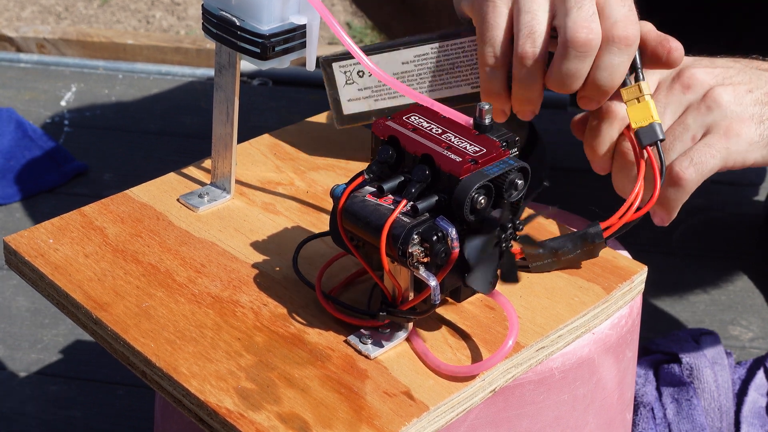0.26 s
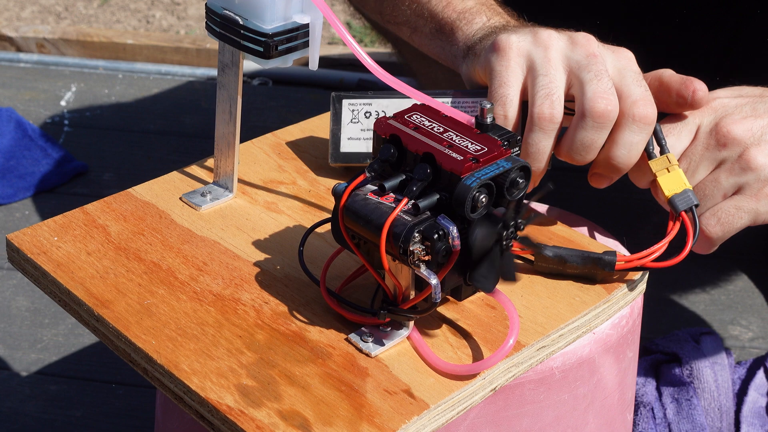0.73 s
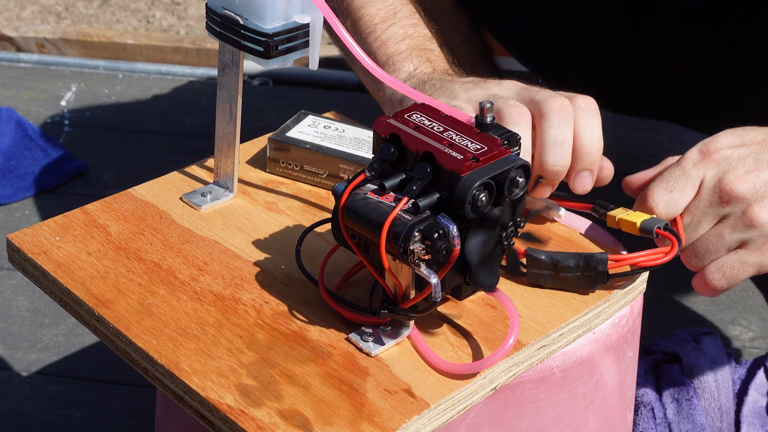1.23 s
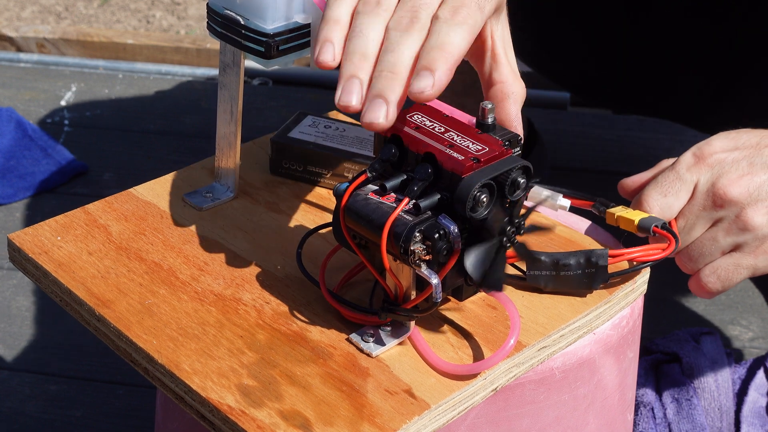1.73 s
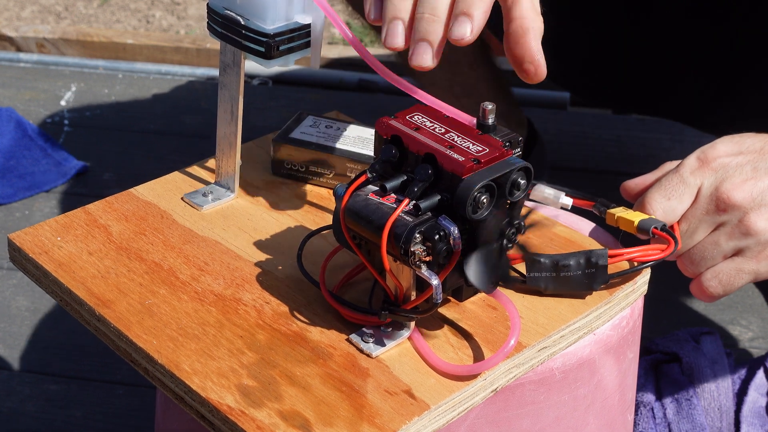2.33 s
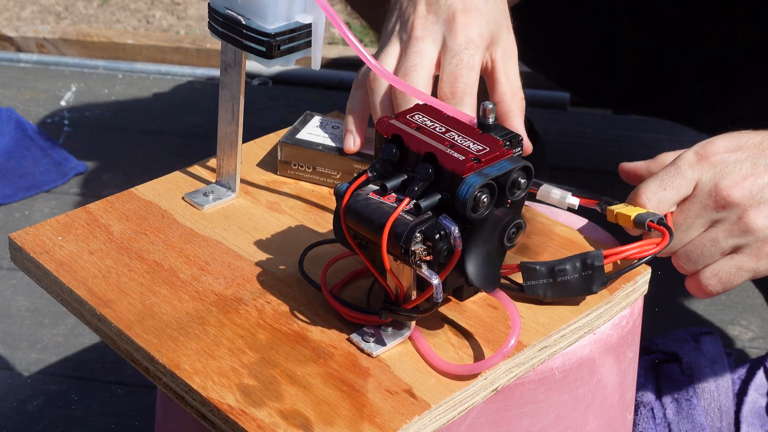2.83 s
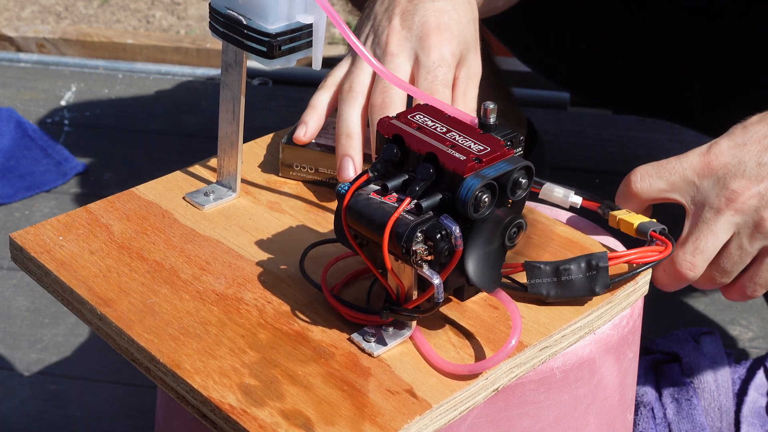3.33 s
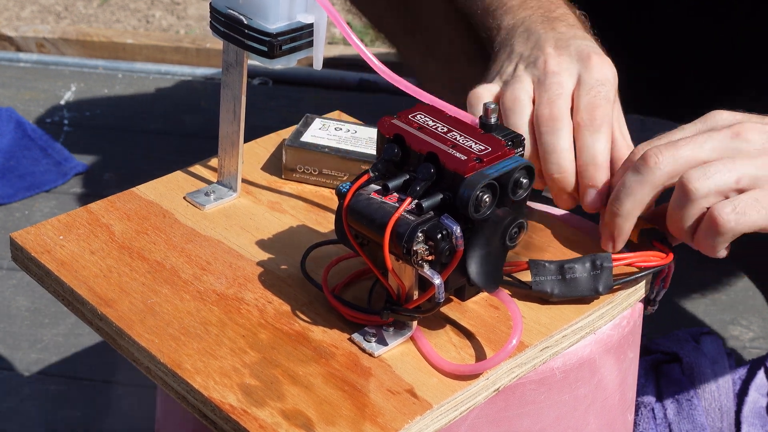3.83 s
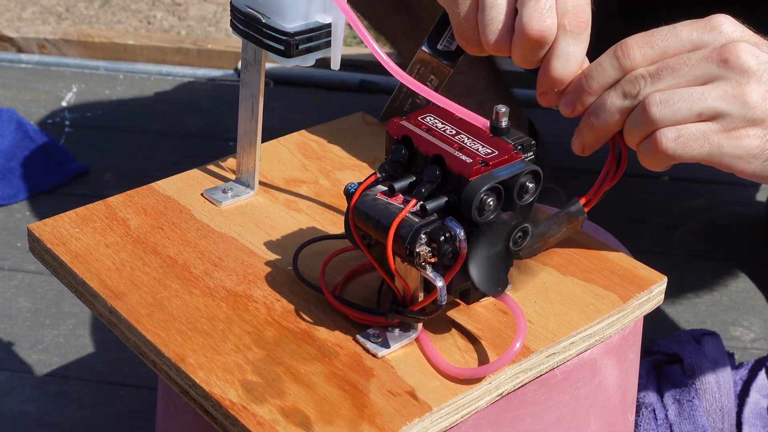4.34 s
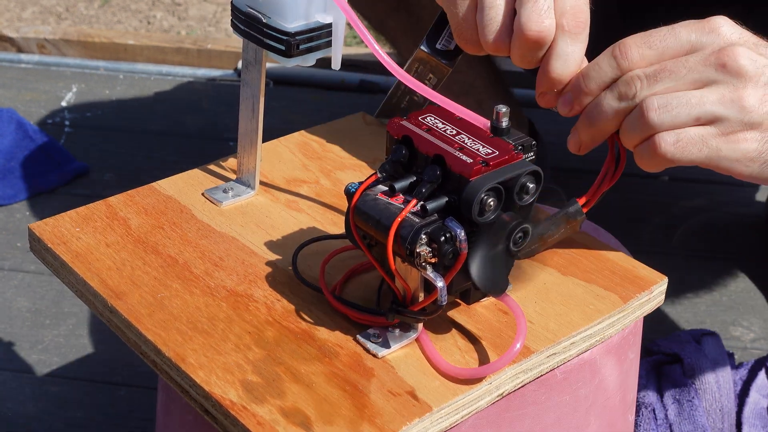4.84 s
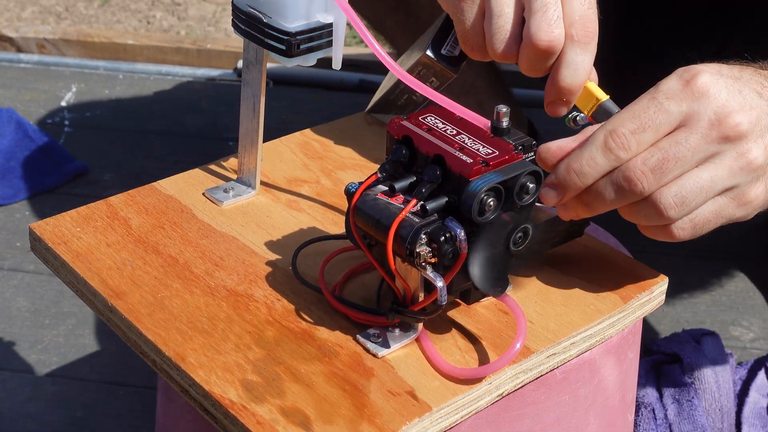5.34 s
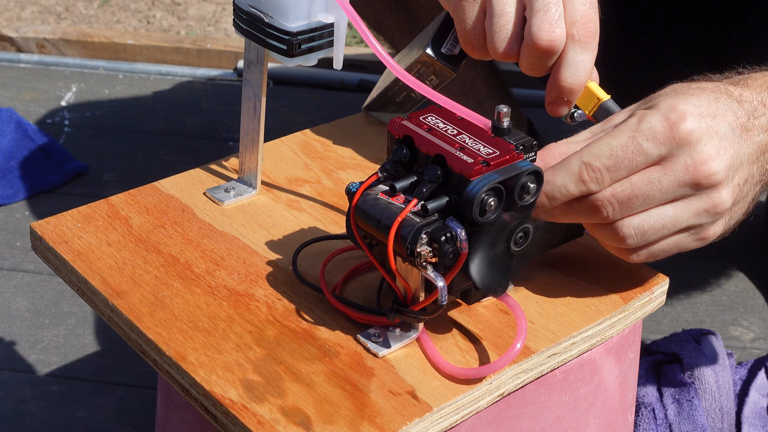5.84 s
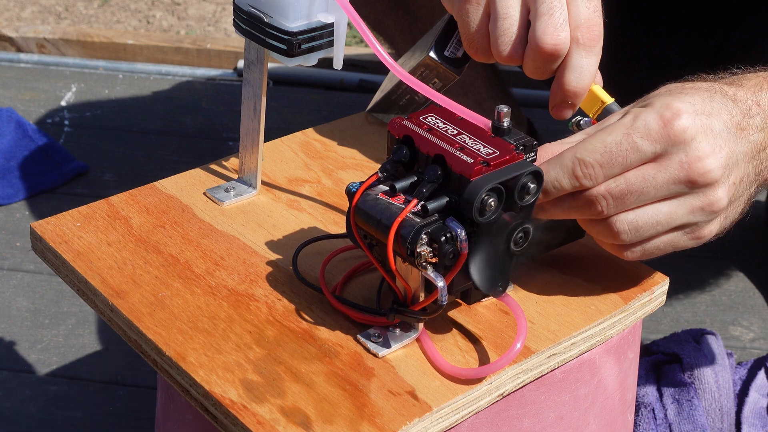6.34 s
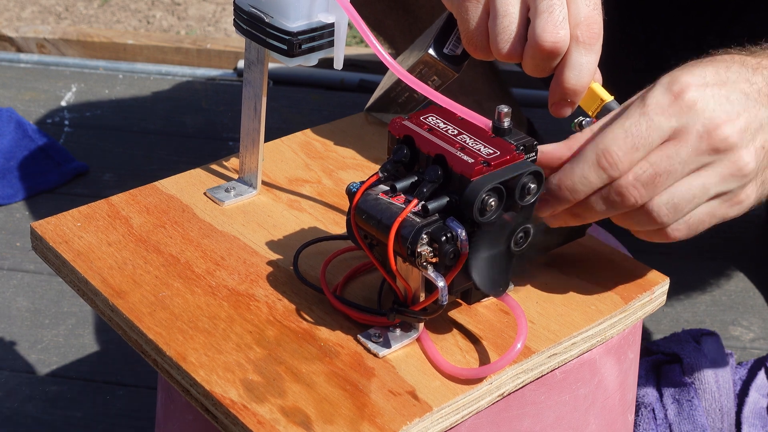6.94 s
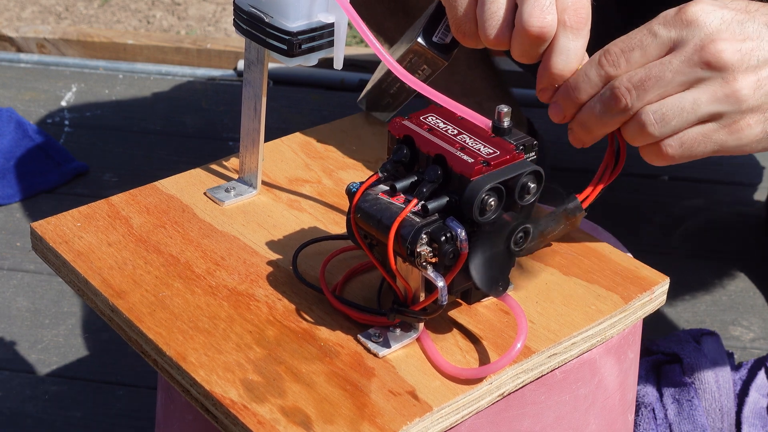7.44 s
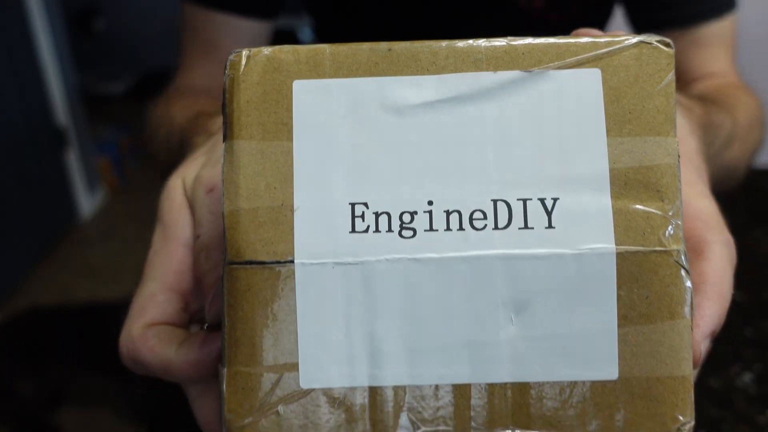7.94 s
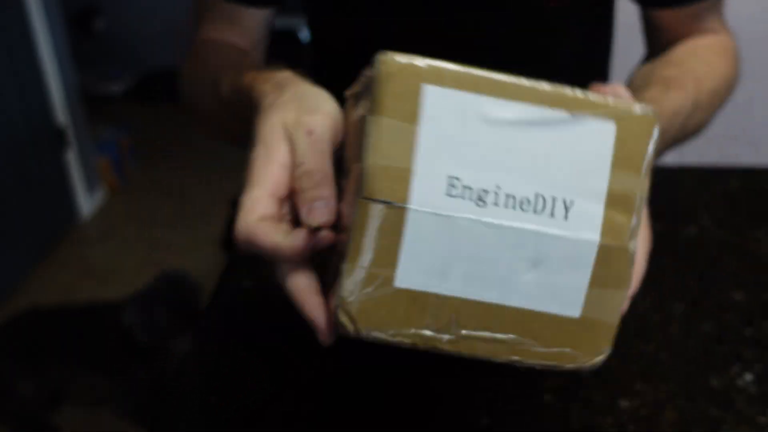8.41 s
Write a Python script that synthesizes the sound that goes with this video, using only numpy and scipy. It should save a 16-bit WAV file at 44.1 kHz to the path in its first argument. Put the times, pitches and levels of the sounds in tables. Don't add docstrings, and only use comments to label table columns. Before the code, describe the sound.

Quiet open yard air with tiny contact ticks and a faint far bird lasts until 0.32 s, when a starter clunks on, scrapes into mesh and its belt groans briefly. From 0.45 to 2.25 s it heaves the small engine about fifteen times a second, gears clacking, board shaking, metal squealing, with a sharp knock at 1.2. At 2.25 the gear scrapes again and the belt screeches, falling in pitch; hard kicks follow, strongest near 2.58. The engine catches, spitting and hissing, and by 2.8 runs loud and rough, a raspy uneven buzz with valve clatter and a high whistle sinking in pitch. Around 6.27 it jumps to a faster, cleaner, steadier buzz. At 7.9 it cuts abruptly to soft, low room air. Light hollow taps on cardboard come from 8.3, with a grainy palm slide over tape from 8.45 to the end, about 8.67.

```python
import sys
import numpy as np
from scipy import signal
from scipy.fft import rfft, irfft, next_fast_len
from scipy.io import wavfile
from scipy.ndimage import map_coordinates

SR = 44100
rng = np.random.default_rng(int(sys.argv[2]) if len(sys.argv) > 2 else 0)


def decibels_to_gain(level_db):
    exponent = np.asarray(level_db, float) / 20
    return 10 ** exponent


def wrap_up_sound(samples):
    columns = np.atleast_2d(samples).T
    tamed = np.clip(columns, -1, 1)
    steps = np.round(tamed * 32767).astype(np.int16)
    wavfile.write(sys.argv[1], SR, steps)


N = 382347
T = np.arange(N) / SR
CUT = 7.8975

# crank position [turns], puff level/dB, clack level/dB, inlet share [0-1]
ROUGH_CYCLE = [
    (0, -1, -1, .1),
    (.27, -1, 0, .1),
    (.62, -9, -8, .7),
    (1.02, -4, -2, .2),
    (1.29, -4, -2, .2),
    (1.64, -9, -9, .7),
]
# crank position [turns], puff level/dB, clack level/dB, inlet share [0-1]
CLEAN_CYCLE = [
    (0, 0, 0, .15),
    (.25, -11, -10, .7),
    (.5, -8, 0, .3),
    (.75, -12, -11, .7),
]
# t/s, speed [turns/s]
ROUGH_SPEED = [(2.328, 47.7), (2.55, 48.2), (2.8, 58.6), (2.94, 58.6), (3.39, 55.3), (3.47, 52.9),
               (3.55, 57), (3.71, 59.6), (4.43, 60.4), (4.55, 57.5), (4.68, 57), (4.76, 59.2), (5.03, 60.2),
               (5.31, 59), (5.37, 55.1), (5.52, 59.3), (6.04, 59.5), (6.27, 63.2)]
CLEAN_SPEED = [(6.27, 71.1), (6.392, 74.6), (6.462, 74.9), (6.504, 73.5), (6.614, 72.6), (6.798, 75.7),
               (6.916, 74), (6.966, 74.8), (7.018, 72.7), (7.064, 72.3), (7.202, 74.7), (7.298, 74.4),
               (7.396, 75.9), (7.498, 75.6), (7.724, 78.9), (7.79, 77), (7.897, 76.3)]
# order [per turn], level/dB
ROUGH_ORDERS = [(1, -14.5), (2, -12.5), (3, -29), (4, 5.5), (5, 6.5), (6, -16), (7, -1), (8, -2), (9, 3),
                (10, -2), (11, 9.5), (12, 1), (13, -2), (14, -32), (15, -12.5), (16, -3), (19, -4.5)]
CLEAN_LOW_ORDERS = [(1, -18), (2, -13), (3, -12), (4, 0), (5, -11), (6, 0), (7, -1), (8, -6), (9, -4),
                    (10, -4), (11, -6), (12, -6)]
# f/Hz, width/Hz, level/dB
EXHAUST_PIPE = [(634, 260, 3), (344, 243, -5), (1140, 480, -5)]
PLYWOOD = [(200, 134, -10), (268.2, 9, 6), (472, 59, 2.5), (669.6, 63, 9), (930, 245, -2.5),
           (1450, 30, -12.5)]
# f/Hz, width/Hz, level/dB
ROUGH_VALVES = [
    [(1990, 14, 9), (3090, 550, 9), (5700, 8100, -33)],
    [(2570, 280, 8.5), (3580, 12000, 4), (4460, 300, -7)],
]
CLEAN_VALVES = [
    [(2250, 27, 1), (2790, 460, 4.5), (3250, 350, 7.5), (4140, 170, -5.5)],
    [(2530, 490, 6), (3700, 980, 7), (6000, 420, -16)],
]
# f/Hz, level/dB
GAS_COLOUR = [(1000, -30), (1400, -9), (1800, -12), (3100, -1), (5200, -3), (6500, -1.5), (8200, -5.5),
              (10500, -10), (16000, -17)]
# t/s, f/Hz, level/dB
BOARD_BOOM = [(2.56, 257.5, -18.5), (2.666, 245.5, -6), (2.688, 271, -38.5), (2.87, 293.7, -41),
              (3.032, 281.4, -15), (3.088, 250, -54), (3.12, 289, -47), (3.366, 277, -15),
              (3.5, 265.3, -17)]
# t/s, f/Hz, level/dB
WHISTLE = [
    [(.65, 9780, -59), (1.3, 9840, -43), (1.75, 9600, -44), (2.25, 9600, -37.5)],
    [(2.4, 9800, -51), (2.55, 9500, -34), (2.65, 9100, -24.5), (2.9, 8550, -22.5), (3.45, 8300, -21),
     (3.6, 8190, -22.5), (3.92, 7930, -25), (4.258, 8000, -28.5)],
    [(4.26, 7360, -23), (4.68, 7440, -23.5), (5.27, 7350, -20.5), (5.36, 7440, -22), (5.62, 7440, -24),
     (6.1, 7340, -23), (6.3, 7180, -30), (7.06, 7155, -29.5), (7.9, 7080, -31.5)],
]
# t/s, f/Hz, level/dB
NARROW_RINGS = [
    [(2.62, 9200, -45), (2.85, 8900, -33), (4.258, 8800, -38)],
    [(2.6, 9400, -56), (4.3, 9057, -42), (7.897, 9230, -40)],
    [(7.15, 4300, -48), (7.3, 4330, -38), (7.897, 4340, -40)],
    [(5.2, 14700, -56), (5.4, 14900, -50), (6.1, 14800, -52), (6.25, 14300, -58)],
]
# t/s, strength level/dB
HEAVES = [(0.4635, -17), (0.5406, -14), (0.609, -8), (0.6753, -5), (0.7427, -4), (.8094, -5), (.8784, 0),
          (.9484, -18), (1.016, -7), (1.0816, -6), (1.152, -6), (1.216, -5), (1.288, -7.5), (1.3495, -2.5),
          (1.42, -16), (1.487, -6), (1.5532, -1), (1.6227, -5.5), (1.6932, -15), (1.759, -9), (1.826, -6),
          (1.901, -11), (1.967, -14), (2.033, -6), (2.0994, -16), (2.1594, -7), (2.223, -7)]
# t/s, strength level/dB
KICKS = [
    (.321, -19),
    (.3285, -33.5),
    (0.344, -18),
    (2.355, -9),
    (2.396, -14),
    (2.447, -9),
    (2.477, -12),
    (2.535, -11),
    (2.5842, 3),
    (2.649, -12),
]
# t/s, effort level/dB, slack [0-1]
STARTER_EFFORT = [(.316, -39, 0), (.36, -13.5, 0), (.39, -26, 0.2), (.49, -14, 0), (1.5, -11, 0.4),
                  (1.84, -14, 0.78), (2.03, -13, 1), (2.27, -13, 0.85), (2.295, -30, 0), (2.318, -25, 0),
                  (2.34, -16.5, 0.4), (2.75, -12, 0.8)]
# f/Hz, width/Hz, level/dB
CRANKED_PLYWOOD = [(227, 35.3, 4), (335.4, 20.7, 7.5), (452, 27.5, 2.5), (725, 37.4, -1.5), (966, 81, -4.5)]
# f/Hz, level/dB per Hz
RATTLE_COLOUR = [(900, 2), (1300, -19), (1750, -33), (2400, 5.5), (3500, 6), (6200, -1.5), (7500, -2),
                 (10500, -9.5), (16000, -15)]
# t/s, peak level/dB, ring f/Hz
TOOTH_CLACKS = [(0.3203, -28, 2670), (0.3428, -20, 2910), (0.368, -20, 3620), (0.467, -14, 3230),
                (0.5403, -15, 2880), (0.6082, -15, 4120), (0.6775, -11, 3380), (0.7436, -13.5, 3280),
                (0.7942, -11, 3000), (0.8795, -8, 2670), (0.9479, -10, 4250), (1.017, -11, 2640),
                (1.0811, -13, 3570), (1.11, -17, 4070), (1.1502, -9.5, 2810), (1.2174, -8, 2900),
                (1.2861, -10, 2820), (1.342, -9, 2530), (1.3532, -9, 2700), (1.3959, -19, 2940),
                (1.419, -14, 2850), (1.4852, -10, 3200), (1.5366, -15, 2760), (1.553, -8, 2860),
                (1.62, -7.5, 3000), (1.693, -8.5, 3370), (1.736, -16, 2300), (1.7576, -12, 2840),
                (1.7855, -17, 3320), (1.804, -14, 3440), (1.8254, -11, 3420), (1.9013, -17, 3360),
                (1.9704, -13, 2380), (2.0743, -20, 2460), (2.2215, -12, 5900), (2.2522, -3, 5930),
                (2.3555, -7.5, 2860), (2.3807, -11, 3350), (2.394, -5, 3050), (2.4455, -3.5, 3400),
                (2.4784, -23, 2000), (2.4784, -9, 4170), (2.504, -16.5, 3260), (2.5333, -9, 3310),
                (2.5584, -8, 3010), (2.583, -6, 4230), (2.6225, -5, 4380), (2.648, -9, 3180),
                (2.7388, -11, 6210), (2.7523, -7, 4300), (2.7872, -9, 3510), (2.8092, -8, 3600)]
# t/s, peak level/dB
SQUEALS = [(0.4403, -12), (0.4692, -21), (0.5445, -20), (0.6009, -26), (0.6318, -36), (0.6648, -27),
           (0.7167, -30), (0.7506, -19), (0.8149, -22), (0.8713, -36), (0.9042, -35), (0.9362, -18),
           (1.0205, -21), (1.0728, -20), (1.1557, -13), (1.2135, -11), (1.2933, -19), (1.3447, -15.5),
           (1.4116, -24), (1.4849, -28), (1.5403, -11), (1.5996, -30), (1.6321, -19), (1.6954, -22),
           (1.7468, -13), (1.8311, -17), (1.9474, -26), (2.1015, -34), (2.1289, -32), (2.2222, -22),
           (2.2542, -26), (2.2841, -7.5), (2.3609, -8.5), (2.3963, -18), (2.4248, -22), (2.4552, -13),
           (2.5076, -15), (2.5515, -20), (2.5959, -11), (2.6403, -24)]
# t/s, peak level/dB
BOARD_JOLTS = [(0.32, -9), (0.386, -8), (0.438, -5), (0.527, -7.5), (0.612, -7), (0.675, -6.5), (0.729, -9),
               (0.798, -4.5), (0.876, -12), (0.933, -13), (1.001, -7.5), (1.066, -7), (1.155, -7.5),
               (1.223, -13), (1.273, -8), (1.346, -7.5), (1.424, -24), (1.476, -15), (1.629, -16),
               (1.692, -7.5), (1.76, -12), (1.815, -19), (2.015, -31), (2.016, -31), (2.074, -22),
               (2.105, -26), (2.159, -25), (2.221, -30), (2.338, -15), (2.392, -2), (2.452, -5),
               (2.553, -9), (2.583, -9), (2.618, -10)]
# t/s, peak level/dB
MESH_LOADS = [(0.469, -7), (0.533, -6), (0.6, -19), (0.634, -21), (0.671, -14), (0.701, -22), (0.817, -4),
              (0.88, -5), (0.956, -6.5), (1.024, -9.5), (1.087, -16), (1.14, -12), (1.203, -17),
              (1.229, -15), (1.277, -19), (1.325, -16), (1.354, -9), (1.434, -25), (1.522, -10),
              (1.564, -5), (1.594, -24), (1.627, -5.5), (1.695, -9.5), (1.82, -10), (1.911, -13),
              (1.947, -13), (2.013, -12), (2.076, -11), (2.137, -16), (2.16, -14), (2.223, -10),
              (2.269, -19), (2.33, -19), (2.359, -10), (2.402, -9), (2.453, -15), (2.518, -14), (2.555, -8),
              (2.586, -14), (2.701, -15)]
# t/s, level/dB
PINION_GRIND = [
    [(.3665, -12), (.38, -13), (.384, -23), (.44, -23), (.448, -40)],
    [(2.2525, -11), (2.263, -15), (2.272, -20), (2.328, -20), (2.338, -32)],
]
# t/s, f/Hz, level/dB
BELT_GROAN = [(.372, 994, -9), (.384, 954, -14), (.396, 930, -20), (.407, 890, -15.5), (.42, 912, -11.5),
              (.446, 960, -21.5)]
# t/s, f/Hz, level/dB, overtone level/dB
BELT_SCREECH = [(2.266, 1183, -30, -3.5), (2.276, 1152, -18.5, -0.5), (2.315, 1117, -21, 1.5),
                (2.322, 1064, -10, -7), (2.329, 1020, -18, -19), (2.342, 930, -17, -34)]
# multiple of the fundamental, level/dB
BELT_OVERTONES = [(1, 0), (2, -3), (3, -5), (4, -3), (5, -8), (6, -11), (7, -14), (8, -9)]
# t/s, f/Hz, level/dB
BELT_SLIPS = [
    [(.333, 960, -29), (.341, 1010, -20), (.349, 1053, -23)],
    [(.397, 706, -22), (.407, 710, -11.5), (.423, 710, -19), (.436, 700, -21)],
    [(2.26, 1540, -36), (2.272, 1500, -22), (2.288, 1450, -32)],
]
# t/s, level/dB, thud level/dB, length [s]
CONTACTS = [(0.019, -47, -3, 0.0078), (0.246, -52, -5, 0.0099), (0.057, -51, 0, .006),
            (1.213, -17, 5, 0.0044), (8.325, -45, 10, 0.006), (8.391, -46, 4, 0.006),
            (8.448, -44, 5, 0.006), (8.46, -42, 4, 0.006), (8.483, -41, 13, 0.006), (8.566, -41, 6, 0.006),
            (8.6634, -35, -8, 0.006)]
# f/Hz, level/dB per Hz
YARD_COLOUR = [(15, -51), (25, 5), (137, -8), (170, 1.5), (384, -12), (439, -8), (1020, -10.5),
               (2110, -26.5), (7920, -35.5), (16000, -43)]
# t/s, f/Hz, level/dB
BIRD_CALL = [(.11, 7800, -75), (.14, 7960, -77), (.23, 8600, -74), (.26, 9600, -66), (.285, 9300, -69),
             (.32, 9300, -66)]
# f/Hz, level/dB
ROOM_COLOUR = [(25, -25), (55, -12), (200, -5), (500, -7.5), (1000, -11.5), (1500, -19.5), (2500, -27.5),
               (6000, -34.5), (9000, -44), (16000, -42)]
# t/s, level/dB
PALM_SLIDE = [(8.44, -58), (8.474, -46), (8.484, -36), (8.525, -34), (8.543, -34), (8.55, -38), (8.6, -44),
              (8.655, -42.5), (8.67, -26)]
# f/Hz, level/dB
TAPE_COLOUR = [(120, -20), (250, -7), (900, -6.5), (1500, -11), (2500, -28), (3500, -13), (4400, -8.5),
               (5600, -21), (8000, -18.5), (12000, -32), (16000, -40)]


def unit(x):
    return x / np.sqrt(np.mean(x[x != 0] ** 2) + 1e-20)


def curves(rows):
    s, *cols = np.transpose(rows)
    gate = np.clip(np.minimum(T - s[0], s[-1] - T) * 1000, 0, 1)
    return [gate] + [np.interp(T, s, c) for c in cols]


def wobble(rate):
    return map_coordinates(rng.standard_normal(int(N * rate / SR) + 4), [T * rate])


def filtered(x, response):
    m = next_fast_len(N + 8192)
    return irfft(rfft(x, m) * response(np.fft.rfftfreq(m, 1 / SR)), m)[:N]


def resonant(x, modes):
    def response(f):
        total = 0
        for k, (centre, width, db) in enumerate(modes):
            peak = 1j * f * width / (centre * centre - f * f + 1j * f * width)
            total = total + (-1) ** k * decibels_to_gain(db) * peak
        return total * (1j * f / (1j * f + 90)) ** 2
    return filtered(x, response)


def noise(colour):
    f, db = np.transpose(colour)
    shape = lambda hz: decibels_to_gain(np.interp(np.log(hz + 1), np.log(f), db))
    return unit(filtered(rng.standard_normal(N), shape))


def swells(times, gains, rise, fall):
    t = np.arange(-4096, 4097) / SR
    whole, part = np.divmod(np.asarray(times) * SR, 1)
    spikes = np.zeros(N)
    for k, weight in enumerate((1 - part, part)):
        spikes += np.bincount(whole.astype(int) + k, gains * weight, N + 2)[:N]
    shape = np.where(t < 0, np.exp(-(t / rise) ** 2), np.exp(-np.abs(t) / fall))
    return np.abs(signal.fftconvolve(spikes, shape, "same"))


def tone(rows, drift_hz, flutter_db, orders=((1, 0),)):
    gate, hz, db = curves(rows)
    phase = 2 * np.pi * np.cumsum(hz + drift_hz * wobble(150)) / SR
    wave = sum(decibels_to_gain(level) * np.sin(k * phase + k * k) for k, level in orders)
    return gate * decibels_to_gain(db + flutter_db * wobble(120)) * unit(wave)


def crank_orders(angle, cycle, orders, unsteady):
    place, puff_db, _, _ = np.transpose(cycle)
    steady = np.zeros(N)
    for k, level in orders:
        lead = np.angle(np.sum(decibels_to_gain(puff_db) * np.exp(-2j * np.pi * k * place)))
        swell = decibels_to_gain(level + min(k, 3) * unsteady * wobble(12))
        steady += swell * np.cos(2 * np.pi * k * angle + lead - 3 * np.pi / 4 + unsteady * wobble(9))
    return steady


def uneven_exhaust(puffs, gate, rumble_db):
    drive = decibels_to_gain(rumble_db) * rng.standard_normal(N) - unit(puffs * gate)
    pipe = unit(gate * resonant(drive, EXHAUST_PIPE))
    board = unit(gate * resonant(drive, PLYWOOD))
    return filtered(pipe + decibels_to_gain(6.5) * board, lambda hz: 1 / (1 + (hz / 1450) ** 8))


def valve_clack(times, ticks, inlet, valves, loose):
    clack = np.zeros(N)
    for part, modes in zip((1 - inlet, inlet), valves):
        blow = swells(times - .0011, ticks * part, .00003, .00003)
        chatter = swells(times - .0008, ticks * part, .0003, .0008) + .12
        chatter = loose * chatter * rng.standard_normal(N)
        clack += resonant(resonant(blow + chatter, modes), [(2700, 1500, 0)])
    return clack


def engine(speed, levels_db, cruise, cycle, orders, valves, turns, jitter, scatter_db, unsteady,
           uneven_db, rumble_db, loose):
    gate, rate = curves(speed)
    below = np.minimum(np.log2(rate / cruise), 0)
    exhaust_db, clack_db, hiss_db = (db + slope * below for db, slope in zip(levels_db, (12, 18, 20)))
    clack_db = clack_db - 14 * np.clip((3.43 - T) / 1.3, 0, 1)
    hiss_db = hiss_db + 6 * np.exp(-np.abs(T - 2.76) / 0.32)
    hiss_db = hiss_db - 2 * (T > 6.4)

    angle = np.cumsum(rate * gate) / SR
    place, puff_db, tick_db, inlet = np.transpose(cycle)
    steady = crank_orders(angle, cycle, orders, unsteady)

    slots = (np.arange(int(angle[-1] / turns) + 1)[:, None] * turns + place).ravel()
    count = len(slots)
    luck = rng.standard_normal((count, 3))
    times = np.interp(slots, angle, T) + jitter * luck[:, 0]
    puff_gains = decibels_to_gain(np.resize(puff_db, count) + scatter_db * luck[:, 1])
    puffs = swells(times, puff_gains, 0.00043, 0.0016)
    uneven = uneven_exhaust(puffs, gate, rumble_db)
    settled = np.clip((T - 2.45) / (2.8 - 2.45), .25, 1)
    exhaust = settled * unit(gate * steady) + decibels_to_gain(uneven_db) * unit(gate * uneven)

    ticks = decibels_to_gain(np.resize(tick_db, count) + scatter_db / 2 * luck[:, 2])
    clack = valve_clack(times, ticks, np.resize(inlet, count), valves, loose)
    rush = (swells(times, ticks, 0.00075, 0.0056) + 0.058) * noise(GAS_COLOUR)
    mix = decibels_to_gain(exhaust_db) * unit(gate * exhaust)
    mix += decibels_to_gain(clack_db) * unit(gate * clack)
    mix += decibels_to_gain(hiss_db) * unit(gate * rush)
    return gate * mix


def rough_engine():
    fan = [(7.17, 8)]
    halfway = [(k + .5, -4 - 1.5 * abs(k + .5 - 9.4)) for k, _ in ROUGH_ORDERS]
    levels_db = (-13.5, -24.5, -24)
    return engine(ROUGH_SPEED, levels_db, 58, ROUGH_CYCLE, ROUGH_ORDERS + fan + halfway, ROUGH_VALVES,
                  turns=2, jitter=.00017, scatter_db=2.2, unsteady=.55, uneven_db=2.5, rumble_db=1.5, loose=.03)


def clean_engine():
    high = []
    for k in range(13, 30):
        stub_db = 11 / (1 + ((k - 27.5) / 1.6) ** 2)
        high.append((k, max(-8 - 2.5 * (k - 12), -28) + stub_db))
    levels_db = (-14.5, -24.5, -23)
    return engine(CLEAN_SPEED, levels_db, 70, CLEAN_CYCLE, CLEAN_LOW_ORDERS + high, CLEAN_VALVES,
                  turns=1, jitter=.000012, scatter_db=1.5, unsteady=.25, uneven_db=-9.5, rumble_db=8, loose=.012)


def board_boom():
    return decibels_to_gain(-5.5) * tone(BOARD_BOOM, drift_hz=7.5, flutter_db=3)


def whistle():
    speed = np.where(T < CLEAN_SPEED[0][0], curves(ROUGH_SPEED)[1], curves(CLEAN_SPEED)[1])
    throb = 1 + .35 * np.exp(2j * np.pi * np.cumsum(4 * speed) / SR)
    notes = sum(tone(rows, drift_hz=18, flutter_db=1.5, orders=((1, 0), (2, -29))) for rows in WHISTLE)
    rings = sum(tone(rows, drift_hz=73, flutter_db=4.5) for rows in NARROW_RINGS)
    return np.real(signal.hilbert(notes, next_fast_len(N))[:N] * throb) + rings


def starter():
    gate, effort_db, _ = curves(STARTER_EFFORT)
    jolt_s, jolt_db = np.transpose(BOARD_JOLTS)
    shake = decibels_to_gain(effort_db - 6.5) + swells(jolt_s + .012, decibels_to_gain(jolt_db - 6.5), 0.01, 0.015)
    board = shake * unit(resonant(rng.standard_normal(N) * decibels_to_gain(1.4 * wobble(300)), CRANKED_PLYWOOD))

    heave_s, heave_db = np.transpose(HEAVES + KICKS)
    clack_s, clack_db, _ = np.transpose(TOOTH_CLACKS)
    rattle = decibels_to_gain(effort_db - 18)
    rattle += swells(clack_s + 0.00065, decibels_to_gain(clack_db - 9), 0.00036, 0.0031)
    rattle += swells(heave_s - .023, decibels_to_gain(heave_db - 24), 0.0028, 0.0041)
    gears = rattle * noise(RATTLE_COLOUR)

    t, teeth = np.arange(SR // 20) / SR, np.zeros(N)
    for at, db, hz in TOOTH_CLACKS:
        teeth[int(at * SR):][:len(t)] += decibels_to_gain(db - 9.5 - 60 * t / 0.036) * np.sin(2 * np.pi * hz * t)

    squeal_s, squeal_db = np.transpose(SQUEALS)
    metal = tone([(.42, 8900, 0), (2.3, 8800, 0), (2.75, 8660, 0)], drift_hz=55, flutter_db=4)
    squeal = swells(squeal_s + 0.002, decibels_to_gain(squeal_db - 11), 0.0017, 0.029) * metal
    return gate * (board + gears + teeth + squeal)


def pinion():
    gate, effort_db, slack = curves(STARTER_EFFORT)
    heave_s, _ = np.transpose(HEAVES + KICKS)
    load_s, load_db = np.transpose(MESH_LOADS)
    load = swells(load_s + 0.0063, decibels_to_gain(load_db), .009, .016)
    beat = swells(heave_s + 0.0049, np.ones(len(heave_s)), 0.025, 0.012)
    hum = decibels_to_gain(-31.5 + np.minimum(effort_db + 19, 0)) + .36 * load
    hum = hum * tone([(.45, 705, 0), (2.7, 705, 0)], drift_hz=26, flutter_db=3.5)

    def ring(mode):
        return unit(resonant(resonant(rng.standard_normal(N), [mode]), [mode]))
    bracket = decibels_to_gain(-51.5 + 28 * slack) * beat * ring((544, 140, 0))
    housing = decibels_to_gain(-44 + 13.5 * slack) * ring((2520, 850, 0))
    in_mesh = T > PINION_GRIND[0][0][0]
    return gate * (hum + in_mesh * decibels_to_gain(4 * wobble(200)) * (bracket + housing))


def engagement():
    rows = [row[:3] for row in BELT_SCREECH]
    overtone_db = curves(BELT_SCREECH)[3] + 2.5
    out = tone(rows, 5, 1) + decibels_to_gain(overtone_db) * tone(rows, 5, 2, BELT_OVERTONES[1:])
    out += sum(tone(slip, 40, 2) for slip in BELT_SLIPS)
    out += tone(BELT_GROAN, drift_hz=50, flutter_db=2.5, orders=[(1, 0), (3, -14), (4, -15)])
    for rows in PINION_GRIND:
        gate, scrape_db = curves(rows)
        scrape = noise([(800, -8.5), (1700, -3.5), (2600, -4), (4000, -1), (6000, -4.5), (8000, -7), (16000, -16.5)])
        out += gate * decibels_to_gain(scrape_db + 3.2 * wobble(400)) * scrape
    return out


def clunks():
    s, db, thud_db, length = np.transpose(CONTACTS)
    crack = noise([(1200, -12), (3500, 0), (7000, -13), (16000, -34)])
    cracks = sum(swells([at], gain, .0003, life / 3) for at, gain, life in zip(s, decibels_to_gain(db - 4), length)) * crack
    blows = swells(s, decibels_to_gain(db + thud_db + 3), 0.000076, 0.000056)
    return cracks + resonant(blows, [(337, 95, -11), (674, 380, 19.5), (1010, 470, -2)])


def sliding_palm():
    gate, slide_db = curves(PALM_SLIDE)
    return gate * decibels_to_gain(slide_db + 1.2 * wobble(600)) * noise(TAPE_COLOUR)


def yard():
    air = decibels_to_gain(-49 + 1.1 * wobble(17)) * noise(YARD_COLOUR)
    whine = tone([(0, 13900, -80), (.4, 13900, -80)], drift_hz=10, flutter_db=2.5)
    return air + whine + tone(BIRD_CALL, drift_hz=20, flutter_db=-1)


def room():
    return decibels_to_gain(-45 + 0.98 * wobble(27)) * noise(ROOM_COLOUR)


def scene():
    running = rough_engine() + clean_engine() + board_boom() + whistle()
    cranking = starter() + pinion() + engagement()
    outdoors = running + cranking + yard()
    indoors = sliding_palm() + room()
    return (np.where(T < CUT, outdoors, indoors) + clunks())[None]


def roll_off(x):
    return signal.sosfilt(signal.butter(12, 16810, fs=SR, output="sos"), x)


def record(dry):
    x = filtered(dry[0], lambda hz: hz ** 2 / (hz ** 2 + 40 ** 2))
    x = x / (1 + np.abs(x / .92) ** 5) ** (1 / 5)
    x = filtered(x, lambda hz: np.clip((16000 - hz) / 350, 0, 1) ** 2)
    return roll_off(x[None])


dry = scene()
out = record(dry)
wrap_up_sound(out)
```